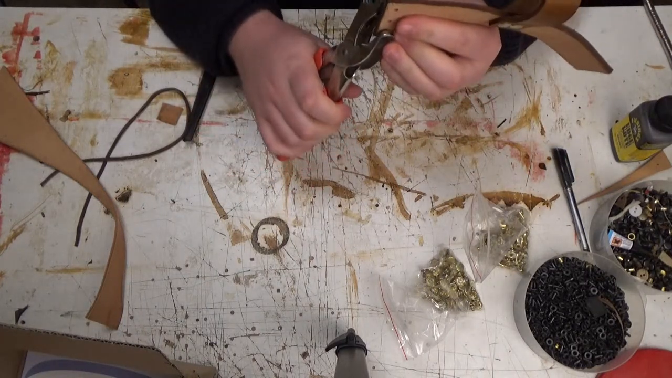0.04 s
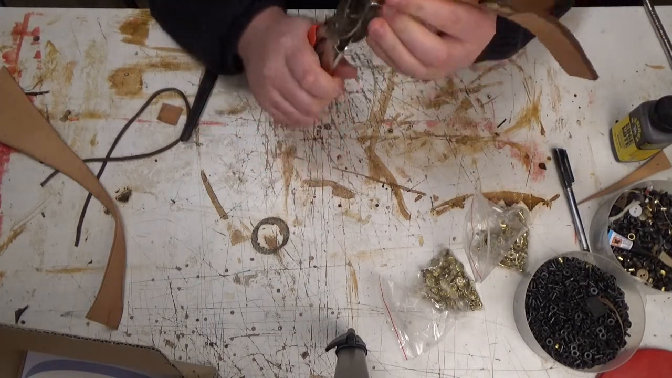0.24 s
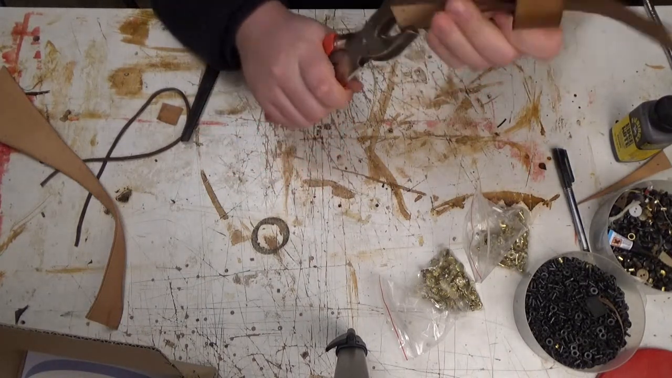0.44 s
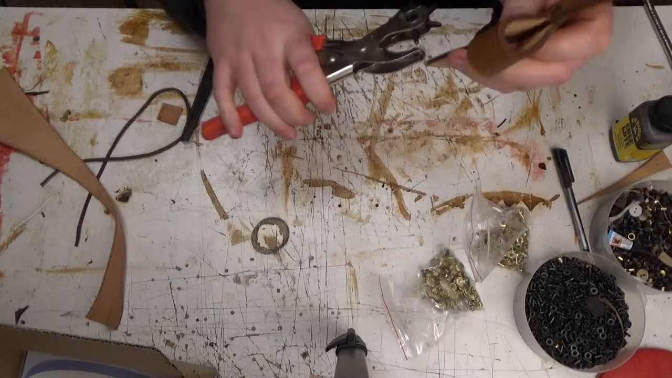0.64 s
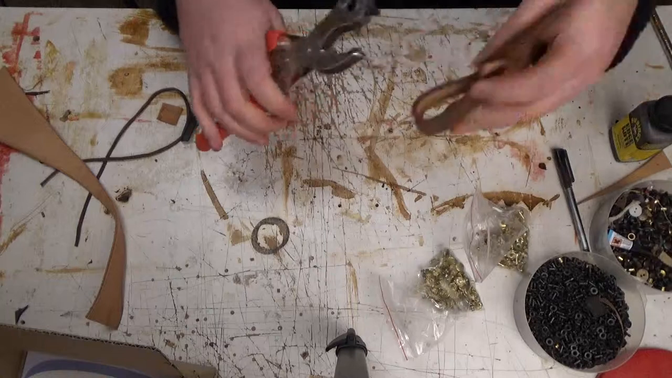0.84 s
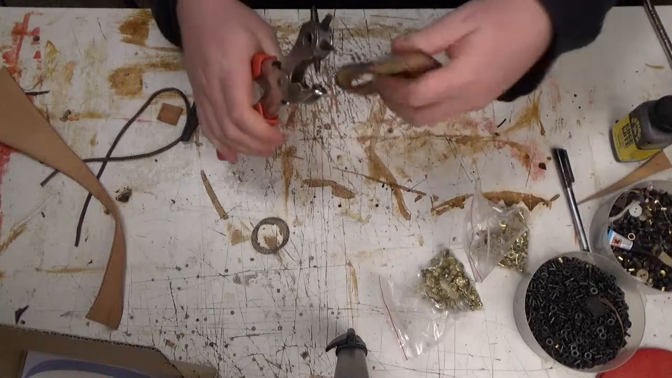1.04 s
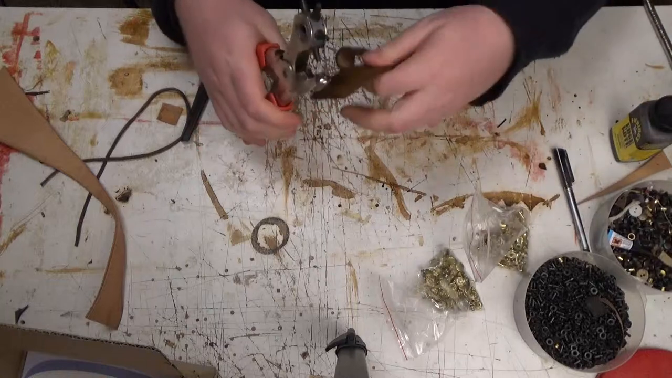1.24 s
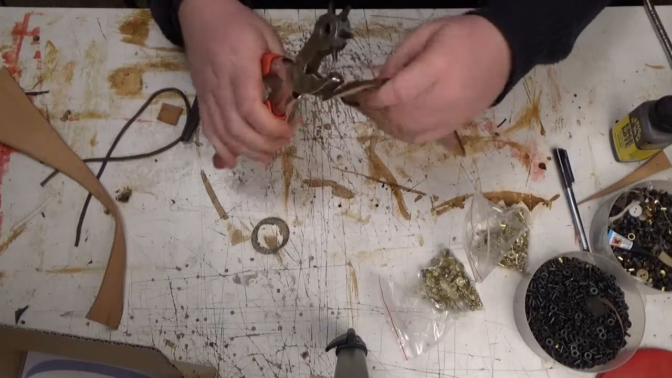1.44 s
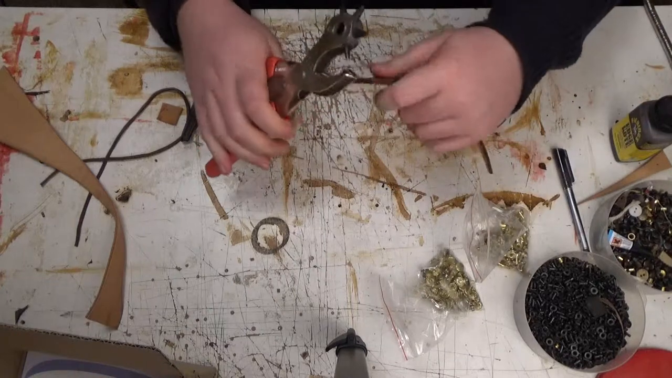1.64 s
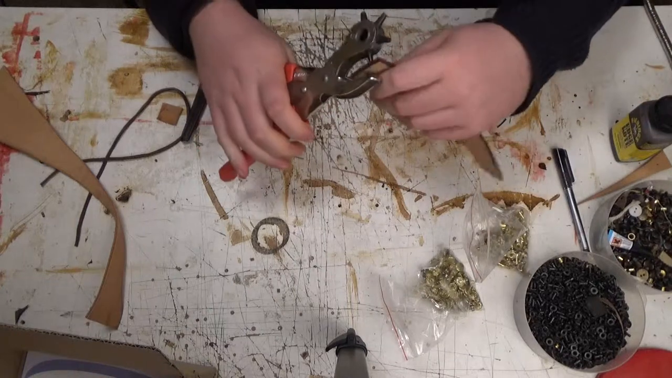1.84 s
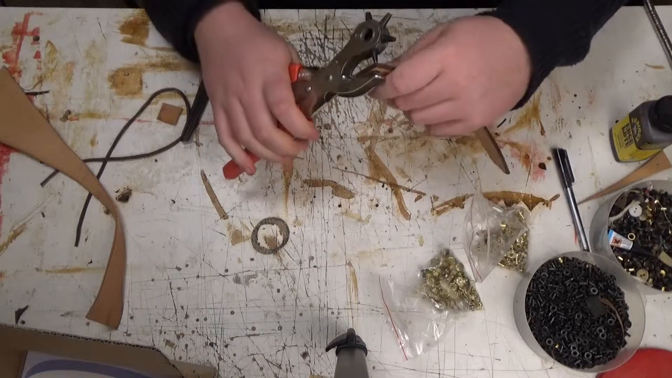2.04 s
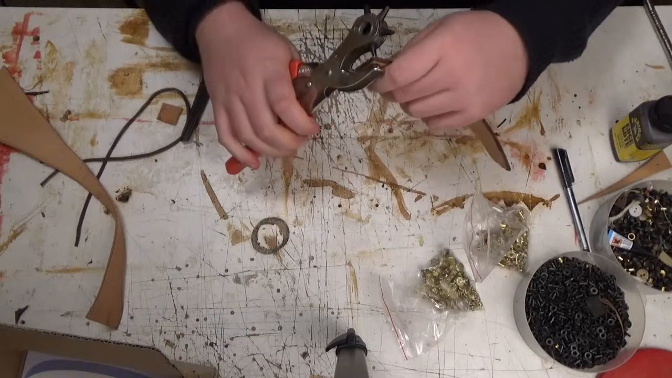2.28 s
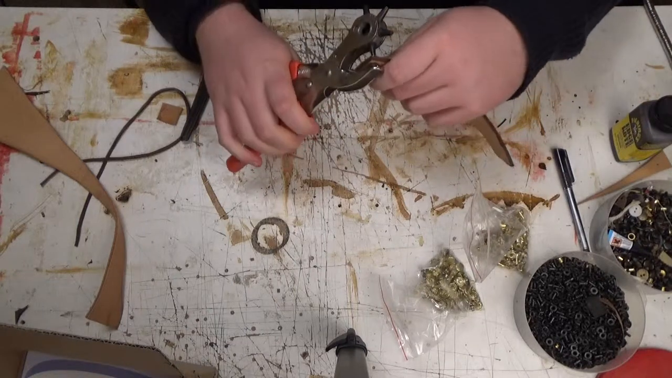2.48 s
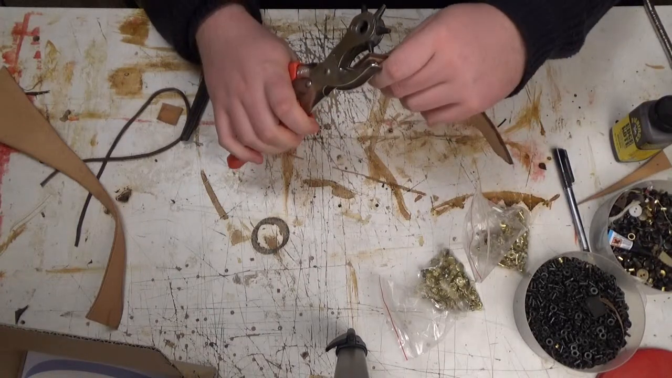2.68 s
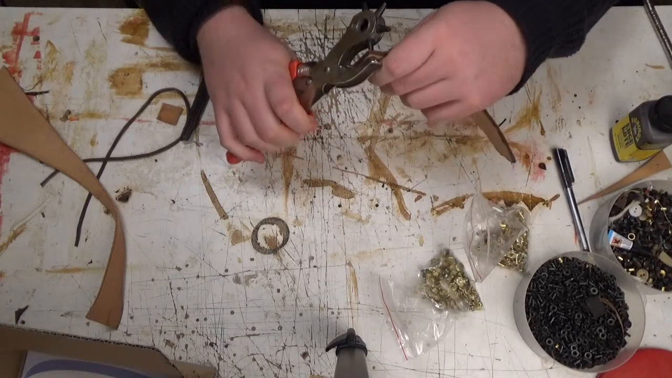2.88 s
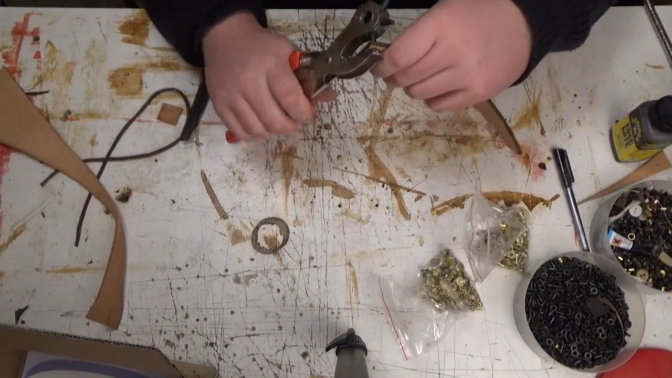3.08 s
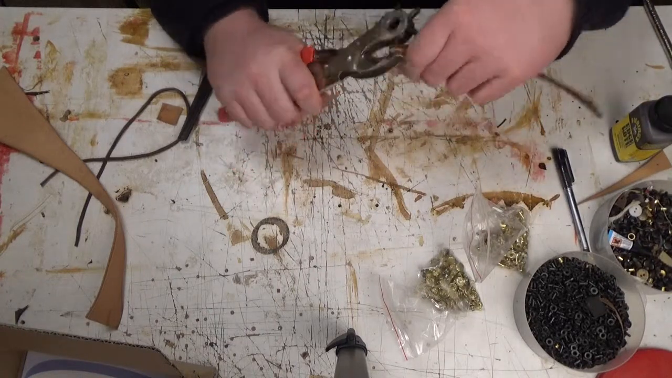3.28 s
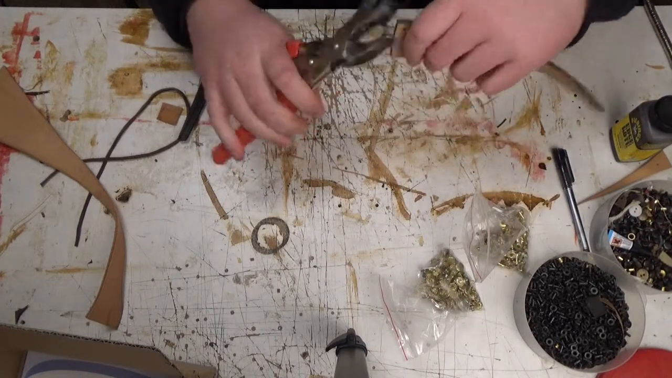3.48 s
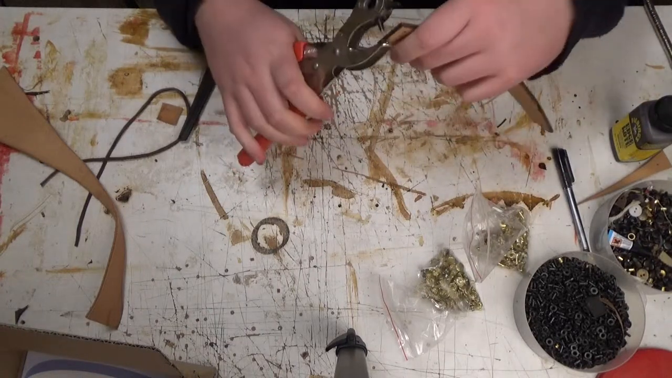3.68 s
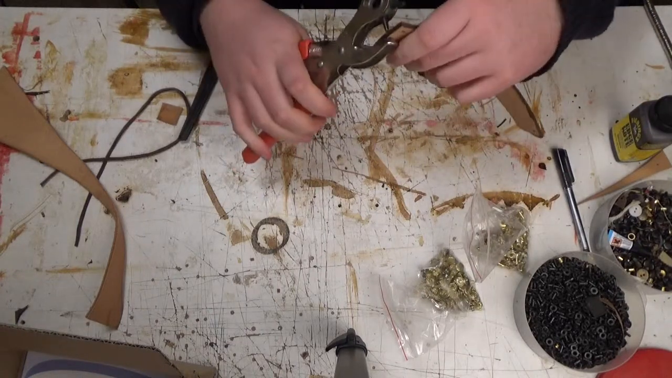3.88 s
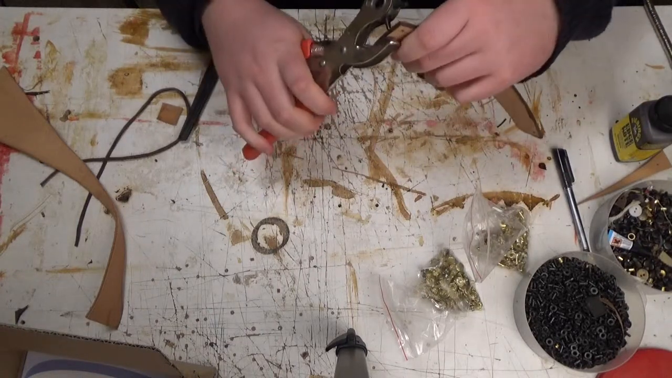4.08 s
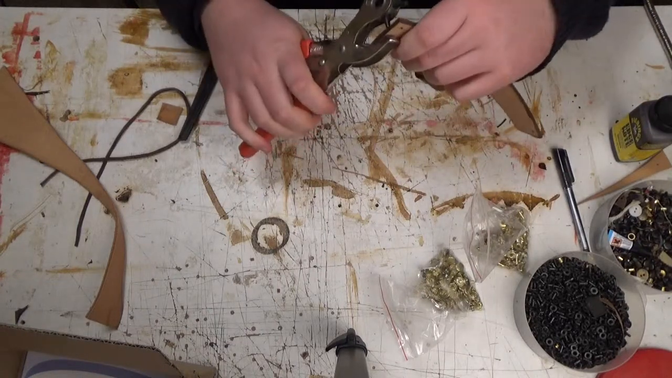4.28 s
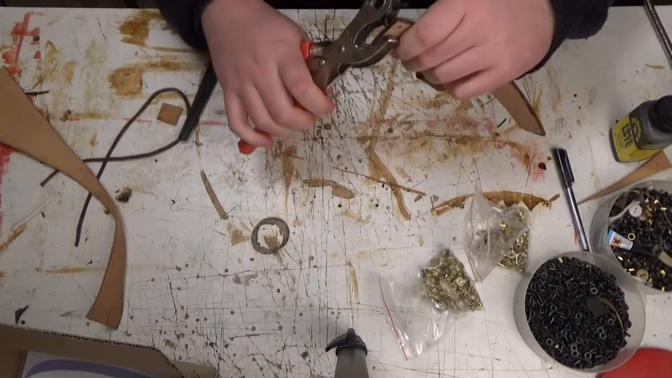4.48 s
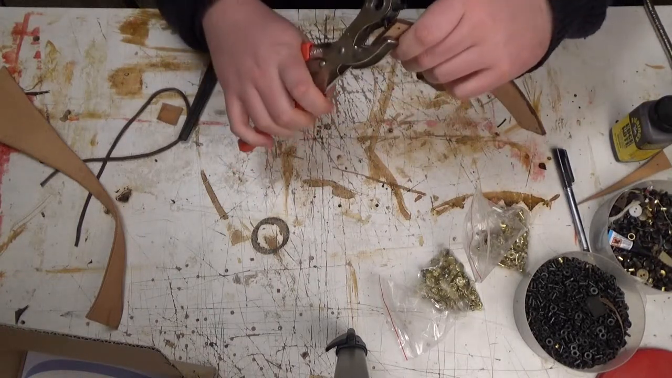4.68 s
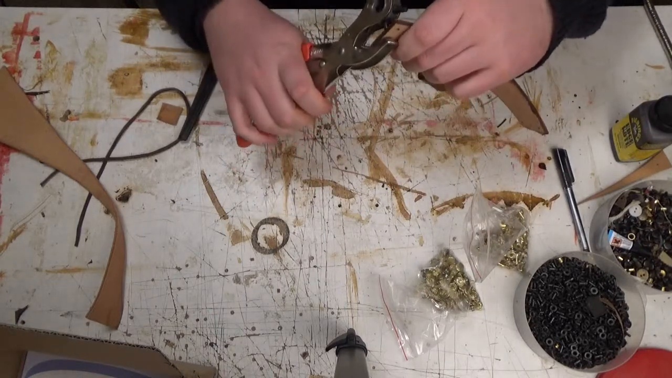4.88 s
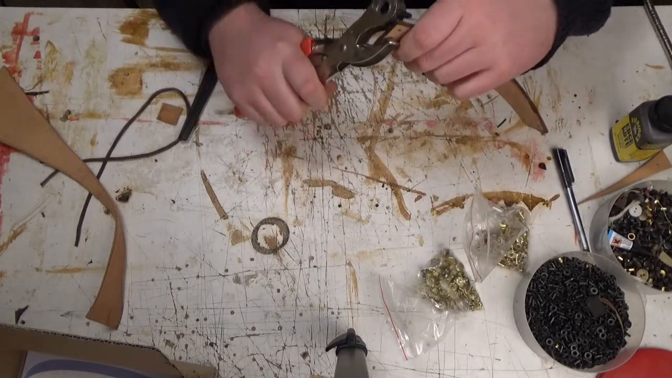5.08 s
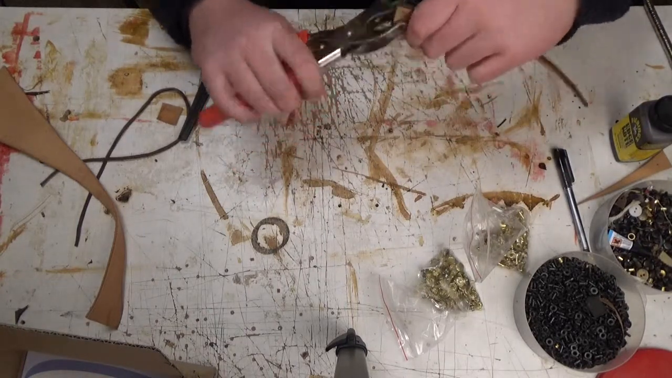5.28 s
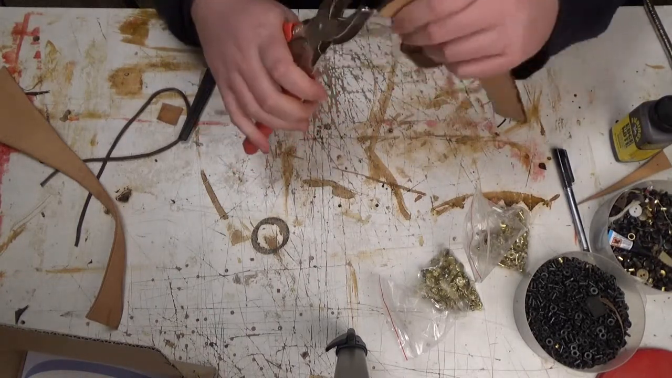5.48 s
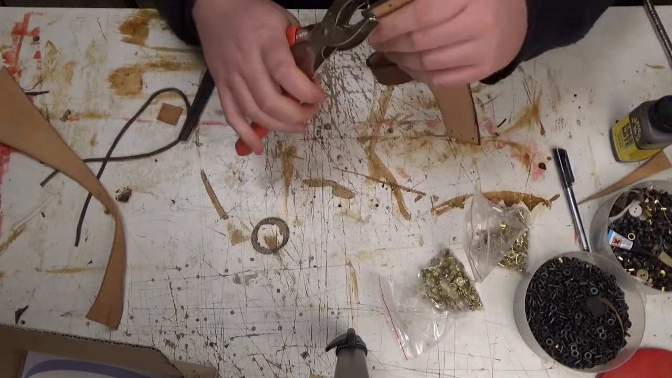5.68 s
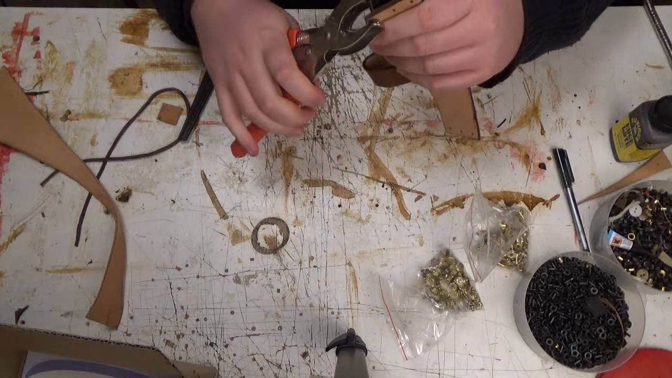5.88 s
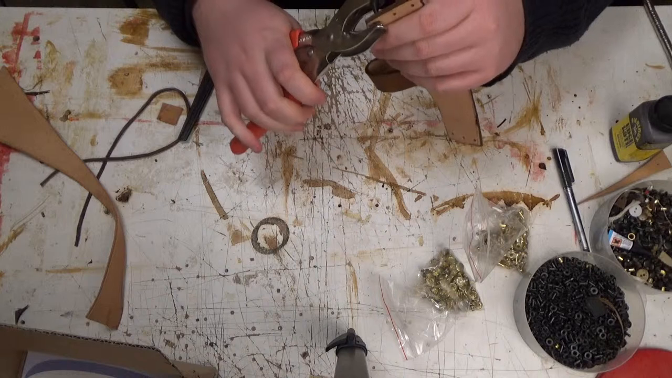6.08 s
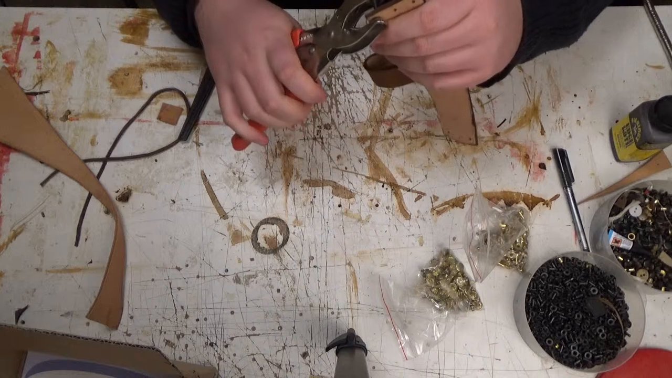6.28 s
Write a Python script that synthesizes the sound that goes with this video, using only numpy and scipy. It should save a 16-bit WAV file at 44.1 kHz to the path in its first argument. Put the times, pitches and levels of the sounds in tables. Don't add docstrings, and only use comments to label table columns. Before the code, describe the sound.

Close, dry stereo at a workbench in a small quiet room, with low hum and a fast faint motor tick. A dry hinge squeaks, then punch pliers crack through thick leather and the tube creaks out. Hands rub the strap, with light knocks. Two more crunching bites follow, separated by a sharp steel latch clack and small ticks; the last pull rises into a short squeal, then a clack and near silence.

```python
import sys
import numpy as np
from scipy import signal
from scipy.fft import rfft, irfft, next_fast_len
from scipy.io import wavfile
from scipy.ndimage import uniform_filter1d

SR = 44100
rng = np.random.default_rng(int(sys.argv[2]) if len(sys.argv) > 2 else 0)


def natural_amplitude(level_db):
    exponent = np.asarray(level_db, float) / 20
    return 10 ** exponent


def bounce(signal):
    frames = np.transpose(np.atleast_2d(signal))
    limited = np.clip(frames, -1, 1)
    pcm = np.round(limited * 32767).astype(np.int16)
    wavfile.write(sys.argv[1], SR, pcm)


N = 279153

# pitch_hz, level_db (per Hz)
AIR = [(18, -21), (70, 0), (207, -1), (415, -6.5), (1090, -11), (4020, -17), (15200, -27), (16500, -26)]
AIR_DB = -60
# pitch_hz, side_to_mid_db
AIR_WIDTH = [(60, -25), (180, -17), (350, -2), (700, -12.5), (1400, 6), (2800, -8), (5600, -4),
             (11000, -13)]
# pitch_hz, width_hz, level_db
HUM = [(100.5, 3.6, -77), (282.6, 5.5, -79), (562.2, 8.8, -71)]
TICK_FIRST_S, TICK_EVERY_S = .0058, .04

# start_s, slips (a count)
SQUEAKS = [(.0575, 3), (.0905, 1), (.0982, 7), (.16, 1), (.177, 1)]
# first_slip_db, fading_per_slip_db
SQUEAK_DB = [(-45.5, 4.1), (-46, 0), (-34.5, 2.1), (-51, 0), (-44, 0)]
SQUEAK_GAP_S = .0067
# pitch_hz, width_hz, level_db
HINGE = [(3870, 51, 0), (4850, 33, 0), (6200, 110, 1), (6550, 28, -2), (7920, 36, 3.5), (9200, 62, 3.5),
         (13000, 95, -7), (14700, 38, -17)]

FAMILY_HZ = [350, 1000, 2300, 4000, 6100, 10500, 19000]
# pitch_hz, width_hz, level_db
JAWS = [(1140, 130, -11.5), (2024, 270, -4), (2410, 170, 4), (2830, 330, -2), (3200, 104, -23),
        (4150, 540, 6), (4800, 460, 4.5), (5630, 590, 6.5), (6400, 220, -2), (9360, 1800, 0.5),
        (12200, 200, -62)]
# pitch_hz, width_hz, level_db
TUBE = [(1700, 250, -16), (3020, 300, 8), (4100, 500, 4), (5850, 500, 8), (8200, 1900, 0), (9700, 500, 1)]
# start_s, strength_db, jaws_db, hardness_db
TAPS = [(.196, -45, -37, -6), (.668, -41, -5, 5), (0.683, -41.5, -12, 5), (3.197, -47.5, -21, -4),
        (3.227, -48, 5, 3), (3.7563, -36, -3, -0.5), (3.8277, -38.5, -5.5, -4), (3.884, -52, 2, 1),
        (3.91, -44.5, -2, -2.5), (3.973, -38, -4.5, 0.5), (4.0468, -46.5, 0.5, -1), (4.0718, -34.5, -7, 0),
        (4.1203, -47, -2, -1), (4.2047, -45, -7, -4), (4.2338, -49, 17, -2.5), (4.298, -51, -4, -9),
        (4.379, -54, -14, 6), (4.4558, -46.5, -12, 6.5), (4.6525, -65, 9.5, -12.5), (4.726, -66, 16, -9.5),
        (5.699, -43.5, -4.5, -5), (5.441, -40.5, -9, 7.5), (1.619, -42.5, -5.5, -8.5),
        (1.722, -47, -1, -10), (2.131, -58, 6, 14), (6.272, -58, -5, 0)]
# start_s, strength_db, jaws_db, hardness_db
LATCH = [(3.4667, -44, -3, 9), (3.4926, -24.5, 2, 4), (3.5009, -18.5, -11, 6), (3.5061, -59, -1, -2),
         (3.5319, -49, -6, 14), (3.5873, -31.5, -18, 8.5), (3.59, -35, -9, -6), (5.3769, -31, 10.5, 8.5),
         (5.4013, -19, -1.5, 6), (5.4071, -26.5, 2.5, 2.5)]
FRAME_HZ, FRAME_WIDTH_HZ, FRAME_DB = 2257, 24.5, 4.5

# start_s, peak_db, pitch_hz
KNOCKS = [(0.257, -31.5, 517), (0.613, -31, 515), (0.74, -43, 796), (1.242, -44.5, 860),
          (1.364, -45.5, 754), (1.457, -36, 1820), (1.611, -44, 253), (1.716, -48, 550), (1.877, -45, 1060),
          (2.643, -51.5, 420), (3.195, -44, 690), (3.207, -31.5, 580), (3.209, -36.5, 330),
          (4.233, -41, 1780), (4.234, -45.5, 382), (4.652, -58, 1400), (4.727, -55, 1500),
          (4.232, -39.5, 800), (4.651, -51, 740), (4.726, -53, 780), (5.695, -47.5, 269),
          (3.4926, -54, 465), (3.5009, -45.5, 453), (5.162, -46, 433), (5.194, -38.5, 392),
          (5.376, -49, 477), (5.401, -44, 510)]
# pitch_hz, level_db, t60_s (time to fade by 60 dB)
BENCH = [(227.3, -19, 0.36), (301, -4, 0.062), (674, -2, 0.05), (1260, -37, 0.11)]

# start_s, strength_db, jaws_db, hardness_db, edge_zing_db
CUTS = [(.3112, -31, 11, -9, -10), (.3134, -26.5, 4.5, -1, -10), (.3291, -19.5, 1, -7, -6.5),
        (.3437, -11, 2.5, -5.5, -15), (.3475, -21.5, 8, -4, -2), (.351, -28, 7, 10, -3),
        (.3546, -19, 1, 0, 0), (.3621, -13, -5, -6.5, -4.5), (.3665, -12.5, 5.5, -7, -12),
        (.3729, -40, 13, 4, 0), (3.2393, -29.5, -11, 2, -7), (3.2408, -30, 6, -2, -1),
        (3.2544, -15, -5, 4, -13), (3.2598, -37, 5, 3, 2), (3.2625, -28, 4, 22, -1),
        (3.267, -37.5, -3, 7, 9), (3.269, -23, -10, 5, 9), (3.279, -27, 15.5, -6, 3),
        (3.2816, -14.5, -1, -1, 0), (3.2855, -9, 0, -5, -4), (3.2893, -25, 10, 1, 0),
        (3.2924, -26, 10, -2, 3), (3.3428, -29, -3, -6, 17.5), (5.1612, -33, -4, 6, 3),
        (5.163, -28, 6, 7, -2), (5.1794, -30, 3, 4, 5), (5.193, -30, 0, 0, 10),
        (5.1955, -14.5, -2, 0.5, 2.5), (5.2033, -18, -4, 0, 3), (5.2051, -12.5, 1, -2.5, 0),
        (5.215, -14, 3, -3, 2), (5.2192, -8.5, -5.5, -5.5, 1), (5.2215, -20.5, 10, -3, 6)]
CUT_RISE_S, CUT_FALL_S = .0011, .0007
JAW_DIP = .45

# start_s, end_s, start_db, end_db, brightness_db
CRUNCH = [(0.34, 0.373, -42, -51, 6), (0.361, 0.421, -31, -37.5, 3), (0.422, 0.45, -44, -50, 4),
          (0.464, 0.517, -41, -48, -7), (3.255, 3.268, -36, -34, -3), (3.273, 3.341, -46, -40, -4),
          (3.349, 3.368, -34, -44, -14), (5.194, 5.208, -25.5, -55, 2), (5.221, 5.253, -32, -36, -0.5),
          (5.252, 5.307, -34, -49, 6.5)]
# pitch_hz, width_hz, level_db
HIDE = [(1150, 400, -14), (2250, 300, 2), (2850, 500, 4), (4300, 600, -8), (5500, 450, -6)]
# start_s, peak_db
JOLTS = [
    (0.341, -40.5),
    (0.364, -39),
    (3.256, -35),
    (3.279, -48),
    (3.348, -39.5),
    (5.196, -93),
    (5.216, -36.5),
]

# start_s, slips_per_s, quickening_per_s2, slips (a count)
PULLS = [
    (.4417, 68, 420, 6),
    (3.3416, 51, 15800, 12),
]
# strength_db, hardness_db, weak_first_slip_db, weak_last_slip_db, jaws_db
GRIP = [
    (-19, 5.5, -10.5, -12, -1.5),
    (-24, 2.5, -2, -20, 2),
]
SLIP_RISE_S = .0003
LET_GO_POWER, GRIP_TO_LEVEL, GRIP_TO_HARDNESS = 4.3, 0.47, 0.76

# start_s, end_s, pitch_hz, level_db
DRAGS = [(.895, 0.975, 3240, -57), (0.96, 0.974, 9750, -52.5), (.915, 0.95, 5900, -58),
         (1.14, 1.167, 3100, -56), (1.215, 1.25, 3400, -52), (1.278, 1.317, 3500, -58),
         (1.28, 1.318, 5400, -51), (1.382, 1.407, 5900, -54), (1.385, 1.43, 9300, -54),
         (1.41, 1.438, 2270, -61), (.5, .62, 3200, -65), (.55, .75, 6030, -63), (1.578, 1.76, 3300, -60.5),
         (2.5, 2.8, 7200, -73), (4.7, 5.1, 9400, -74)]
DRAG_WIDTH = 0.11
# start_s, end_s, level_db, brightness_db
STROKES = [(0.546, 0.608, -49.5, 3.5), (0.592, 0.687, -55.5, -4), (0.7, 0.758, -48.5, 1),
           (0.817, 0.831, -37.5, -3), (0.851, 0.866, -46, -5.5), (0.884, 0.963, -51, 1.5),
           (0.96, 0.989, -50.5, 5), (1.062, 1.101, -51.5, 1), (1.138, 1.177, -55.5, -0.5),
           (1.206, 1.275, -49.5, -2), (1.27, 1.28, -37.5, 5.5), (1.271, 1.331, -51, -0.5),
           (1.361, 1.433, -46, 3.5), (1.431, 1.479, -51, -0.5), (1.501, 1.532, -56, -2.5),
           (1.537, 1.674, -51.5, 1.5), (1.66, 1.765, -50.5, 0.5), (1.738, 1.875, -58.5, -7),
           (1.861, 1.926, -54.5, -0.5), (1.911, 1.981, -49, 1), (1.933, 2.193, -60.5, -4),
           (2.482, 2.783, -76.5, 7.5), (3.556, 3.64, -58.5, -1), (4.713, 5.058, -82.5, 11),
           (5.376, 5.56, -63.5, 1), (5.575, 5.665, -62, 0.5), (5.672, 5.777, -66.5, 5)]
# pitch_hz, width_hz, level_db
SKIN = [(3340, 340, -9), (5700, 620, -9), (9300, 1200, 5.5)]
STROKE_COLOUR_DB = [-6.5, -2.5, -4, -9]
SCUFF_DB = [-2, 2, -4, -2]
SCUFF_S = .014
SHEEN_FROM_S, DULL_SHEEN_DB = 1.4, -6

# start_db, let_go_db, let_go_s
SQUEAL = [(-15.5, -23, 5.281), (-21, -29, 5.28), (-37, -31, 5.297), (-28, -45, 5.275)]
SQUEAL_S, SQUEAL_END_S = 5.2569, 5.301
SQUEAL_RATE, SQUEAL_QUICKENING, SQUEAL_TOP_RATE = 250, 18500, 680
SQUEAL_CUT_DB, SQUEAL_CUT_S = 20, 0.0014

BENCH_SCATTER_DB = -12
SLIDING_BENCH_DB = -20
SQUEAL_WALLS_DB = -23


def resonate(x, hz, width):
    r = np.exp(-np.pi * width / SR)
    turn = 2 * np.pi * hz / SR
    return signal.lfilter([(1 - r * r) / 2, 0, (r * r - 1) / 2], [1, -2 * r * np.cos(turn), r * r], x + 1e-18)


def body(x, modes, plain_db):
    return natural_amplitude(plain_db) * x + sum(natural_amplitude(db) * resonate(x, hz, w) for hz, w, db in modes)


def band(x, low, high):
    return signal.sosfilt(signal.butter(2, [low, high], "band", fs=SR, output="sos"), x)


def low_pass(hz):
    return signal.butter(2, hz, fs=SR, output="sos")


def rms_one(x):
    return x / np.sqrt(np.mean(x ** 2) + 1e-30)


def peaks_at(shapes, db):
    return shapes / np.abs(shapes).max(axis=1, keepdims=True) * natural_amplitude(db)


def coloured(points):
    size = next_fast_len(N)
    hz, db = np.transpose(points)
    log_hz = np.log(np.arange(size // 2 + 1) * SR / size + 1)
    gain = natural_amplitude(np.interp(log_hz, np.log(hz), db))
    return irfft(rfft(rng.standard_normal(size)) * gain, size)[:N]


def split(x, centres_hz):
    size = x.shape[-1]
    spectrum = rfft(x)
    log_hz = np.log(np.arange(size // 2 + 1) * SR / size + 1)
    slices = []
    for hump in np.eye(len(centres_hz))[1:-1]:
        gain = np.sin(np.pi / 2 * np.interp(log_hz, np.log(centres_hz), hump)) ** 2
        slices.append(irfft(spectrum * gain, size))
    return slices


def place(times, shapes):
    out = np.zeros(N + shapes.shape[1])
    for s, shape in zip(times, shapes):
        first = int(s * SR)
        out[first:first + len(shape)] += shape
    return out[:N]


def grains(per_s, spread_db):
    sizes = natural_amplitude(spread_db * np.minimum(rng.exponential(1, N), 4)) * rng.choice([-1, 1], N)
    return sizes * (rng.random(N) < per_s / SR)


def background():
    width_hz, width_db = np.transpose(AIR_WIDTH)
    side_air = [(hz, db + np.interp(np.log(hz), np.log(width_hz), width_db)) for hz, db in AIR]
    mid, side = coloured(AIR), coloured(side_air)
    scale = natural_amplitude(AIR_DB) / np.std(mid)
    hum = sum(natural_amplitude(db) * rms_one(resonate(rng.standard_normal(N), hz, w)) for hz, w, db in HUM)
    return scale * (mid + side * np.array([[1], [-1]])) + hum


def camera_motor():
    at, t = np.arange(TICK_FIRST_S, N / SR, TICK_EVERY_S), np.arange(900) / SR
    weak = np.arange(len(at)) % 2
    strength = natural_amplitude(-47.5 - 7.0 * weak + rng.standard_normal(len(at)))
    tick = np.sin(2 * np.pi * 3300 * t) * np.exp(-t / .0009)
    housing = np.sin(2 * np.pi * 2487 * t) * np.exp(-((t - .005) / .0035) ** 2)
    return place(at, strength[:, None] * tick + natural_amplitude(-62.5) * housing)


def hinge():
    rows = []
    for (start, count), (first_db, fade_db) in zip(SQUEAKS, SQUEAK_DB):
        rows += [(start + SQUEAK_GAP_S * k, first_db - fade_db * k) for k in range(count)]
    rows, t = np.array(rows), np.arange(900) / SR
    push = rng.standard_normal((len(rows), 900)) * np.exp(-t / 0.0025)
    rung = body(push, [(hz, w + 200, db) for hz, w, db in HINGE], plain_db=-27)
    return place(rows[:, 0], peaks_at(rung, rows[:, [1]]))


def contacts(rows, modes, rise_s, fall_s, plain_db, snap, snap_share, colour_db, jaw_share, hard_share):
    rows, t = np.array(rows), np.arange(-100, 1100) / SR
    swell = np.where(t < 0, np.exp(-(t / rise_s) ** 2), np.exp(-t / fall_s))
    push = rng.standard_normal((len(rows), 1200)) * swell
    push[:, 100] += snap * natural_amplitude(snap_share * rows[:, 3])
    parts = split(body(push, modes, plain_db), FAMILY_HZ)
    peaks_db = rows[:, [1]] + colour_db + rows[:, [2]] * jaw_share + rows[:, [3]] * hard_share
    peaks_db[:, -1] += rows[:, 4:].sum(axis=1)
    shapes = sum(peaks_at(part, peaks_db[:, [k]]) for k, part in enumerate(parts))
    return place(rows[:, 0] - 105 / SR, shapes)


def taps():
    return contacts(LATCH + TAPS, JAWS, 0.00065, 0.0025, plain_db=3.5, snap=2.0, snap_share=0,
                    colour_db=[-7.0, -0.4, -1.0, -3.0, -12.0],
                    jaw_share=[1.0, 0.6, 0.0, 0, 0.0], hard_share=[-1.26, 0.0069, -0.36, 0.53, 1.43])


def knocks():
    rows, t = np.array(KNOCKS), np.arange(4000) / SR
    pitch = rows[:, [2]]
    blow = np.sin(2 * np.pi * pitch * t) * np.exp(-t * pitch / 1.3)
    top = 0
    for hz, db, t60 in BENCH:
        strength = natural_amplitude(db + 4.1 * rng.standard_normal((len(rows), 1)))
        top = top + strength * np.sin(2 * np.pi * hz * t) * natural_amplitude(-60 * t / t60)
    share = np.clip(560 / pitch, 0, 1) ** 3.2
    rattle = band(band(rng.standard_normal((len(rows), 4000)), 170, 750), 170, 750)
    rattle *= np.exp(-t / .014)
    shapes = (blow + 0.7 * share * top + 2.2 * share * rattle) * (1 - np.exp(-t / 0.0011))
    return place(rows[:, 0], peaks_at(shapes, rows[:, [1]]))


def cuts():
    snaps = contacts(CUTS, JAWS, CUT_RISE_S, CUT_FALL_S, plain_db=-5.5, snap=1.0, snap_share=0,
                     colour_db=[-13.0, -2.5, -1.0, -2.5, -9.0],
                     jaw_share=[0.0, 0.7, 0, 0.03, 0.041], hard_share=[0.54, 0.0, 0.028, 0.74, 0])
    return snaps - JAW_DIP * band(snaps, 1250, 1900)


def crunch():
    t, level = np.arange(N) / SR, np.zeros((2, N))
    for start, end, start_db, end_db, bright_db in CRUNCH:
        fading_db = np.interp(t, [start, end, end + 0.0041], [start_db, end_db, end_db - 48.5])
        level += np.outer(natural_amplitude([0, bright_db]), natural_amplitude(fading_db) * (t > start))
    tearing = body(grains(7000, spread_db=3.0), HIDE, plain_db=-18)
    tearing = band(band(tearing, 800, 16000), 800, 13000)
    tearing = rms_one(signal.lfilter([1], [1, -.6], tearing))
    dull = signal.sosfiltfilt(low_pass(2550), tearing)
    return level[0] * dull + level[1] * (tearing - dull)


def jolts():
    rows, t = np.array(JOLTS), np.arange(4000) / SR
    shudder = band(rng.standard_normal((len(rows), 4000)) * np.exp(-t / 0.042), 120.0, 780)
    return place(rows[:, 0], peaks_at(shudder, rows[:, [1]]))


def slips():
    rows = []
    for pull, grip in zip(PULLS, GRIP):
        start, rate, quickening, count = pull
        db, hard_db, first_db, last_db, jaws_db = grip
        k = np.arange(count)
        s = start + (np.sqrt(rate ** 2 + 2 * quickening * k) - rate) / quickening
        grip_db = first_db * (k == 0) + last_db * (k / (count - 1)) ** LET_GO_POWER
        strength_db = db + GRIP_TO_LEVEL * grip_db
        hardness_db = hard_db + GRIP_TO_HARDNESS * grip_db
        rows += list(zip(s, strength_db, jaws_db + 0 * k, hardness_db))
    return rows


def creaks():
    return contacts(slips(), TUBE, SLIP_RISE_S, 0.0019, plain_db=-2.0, snap=2.6, snap_share=1.2,
                    colour_db=[-14, -4.0, -1.5, -0.2, -10.0],
                    jaw_share=[0, 1, 0, 0, 0], hard_share=[-0.31, 0.075, 0.15, 1.4, 0.45])


def drags():
    out = np.zeros(N)
    grain = grains(6000, spread_db=4.0)
    for start, end, hz, db in DRAGS:
        span = slice(int(start * SR), int(end * SR))
        patch = resonate(grain[span], hz, DRAG_WIDTH * hz)
        patch = rms_one(resonate(patch, hz, 2 * DRAG_WIDTH * hz))
        out[span] += natural_amplitude(db) * patch * np.sin(np.linspace(0, np.pi, len(patch))) ** 0.8
    return out


def rubbing():
    grain = body(grains(9000, spread_db=3.0), SKIN, plain_db=0)
    grain = signal.lfilter([1], [1, -.25], grain)
    parts = np.array([rms_one(part) for part in split(grain, [900, 2600, 5600, 9500, 13500, 24000])])
    lumps = natural_amplitude(0.36 * rms_one(band(rng.standard_normal(N), 69, 89)))
    wander = rms_one(band(rng.standard_normal((4, N)), 4.7, 41.0))
    parts *= natural_amplitude(2.2 * wander)
    t, levels = np.arange(N) / SR, np.zeros((4, N))
    for start, end, db, bright_db in STROKES:
        scuffs = end - start < SCUFF_S
        colour_db = db + np.array(STROKE_COLOUR_DB) + bright_db * np.array([-1, 0, 1, 1])
        colour_db = colour_db + np.array(SCUFF_DB) * scuffs
        colour_db[3] += DULL_SHEEN_DB * (start < SHEEN_FROM_S)
        inside = np.clip((t - start + 0.0072) / (end - start + 0.014), 0, 1)
        swell = np.sin(np.pi * inside ** 0.95) ** (2.6 if scuffs else 1.11)
        levels += np.outer(natural_amplitude(colour_db), swell)
    creasing = natural_amplitude(-2.0) * rms_one(band(grains(2500, spread_db=5.0), 415, 1270))
    return lumps * (np.sum(levels * parts, axis=0) + uniform_filter1d(levels[0], size=2000) * creasing)


def squeal():
    t = np.arange(N) / SR
    rate = np.minimum(SQUEAL_RATE + SQUEAL_QUICKENING * (t - SQUEAL_S), SQUEAL_TOP_RATE)
    turns = np.cumsum(rate * (t >= SQUEAL_S) * (t < SQUEAL_END_S)) / SR
    pulses = np.diff(np.ceil(turns), prepend=0) * natural_amplitude(1.6 * rng.standard_normal(N))
    voices = [[(5750, 420, -2), (6200, 430, -1), (9900, 700, -7)],
              [(2410, 210, -1.8), (2850, 1200, 0.13)],
              [(557, 220, 1.2), (1260, 810, -2.5), (1770, 110, 3.0)],
              [(9300, 2200, 0.5), (13500, 2600, 0.5)]]
    out = np.zeros(N)
    for (start_db, end_db, s), modes in zip(SQUEAL, voices):
        level_db = np.interp(t, [SQUEAL_S, s, s + SQUEAL_CUT_S], [start_db, end_db, end_db - SQUEAL_CUT_DB])
        ring = body(body(np.eye(1, 300)[0], modes, plain_db=-30), modes, plain_db=-30)
        out += np.convolve(pulses * natural_amplitude(level_db), ring / np.abs(ring).max())[:N]
    return out


def workshop(x, t60, bench_db, walls_db):
    t, sides = np.arange(int(.4 * SR)) / SR, np.array([[1], [-1]])
    tail = rng.standard_normal((2, len(t))) * natural_amplitude(-60 * t / t60) * (1 - np.exp(-t / 0.0042))
    tail = signal.lfilter([1], [1, -.25], tail[0] + 0.45 * tail[1] * sides)
    tail -= .7 * band(tail, 60, 1000)
    tail -= band(tail, 3200, 19000) * (1 - np.exp(-t / .08))
    tail *= natural_amplitude(walls_db) / np.sqrt(np.sum(tail ** 2, axis=1, keepdims=True))
    tail[:, 0] += natural_amplitude([-.4, .4])
    clutter = rng.standard_normal((2, len(t))) * t / .002 * np.exp(-t / 0.003)
    clutter = band(clutter[0] + .5 * clutter[1] * sides, 1500, 19000)
    tail += natural_amplitude(bench_db) * clutter / np.sqrt(np.sum(clutter ** 2, axis=1, keepdims=True))
    return signal.fftconvolve(x[None], tail, axes=1)[:, :N]


def scene():
    tapping, cutting, creaking = taps(), cuts(), creaks()
    frame_push = cutting + 1.2 * creaking + 0.27 * tapping
    frame = natural_amplitude(FRAME_DB) * resonate(frame_push, FRAME_HZ, FRAME_WIDTH_HZ)
    hands = cutting + creaking + frame + tapping + crunch() + jolts() + knocks() + hinge()
    hands = signal.sosfilt(low_pass(18500), hands)
    mix = background() + camera_motor()
    mix = mix + workshop(hands, t60=0.17, bench_db=BENCH_SCATTER_DB, walls_db=-14.5)
    mix = mix + workshop(rubbing() + drags(), t60=0.34, bench_db=SLIDING_BENCH_DB, walls_db=-11.0)
    return mix + workshop(squeal(), t60=0.3, bench_db=BENCH_SCATTER_DB, walls_db=SQUEAL_WALLS_DB)


def top_cut(x):
    return signal.sosfilt(signal.butter(12, 16820, fs=SR, output="sos"), x)


def record(dry):
    rounded = .9 * np.tanh(dry / .9)
    finished = signal.sosfilt(signal.cheby2(10, 60, 17200, fs=SR, output="sos"), rounded)
    return top_cut(finished)


dry = scene()
out = record(dry)
bounce(out)
```